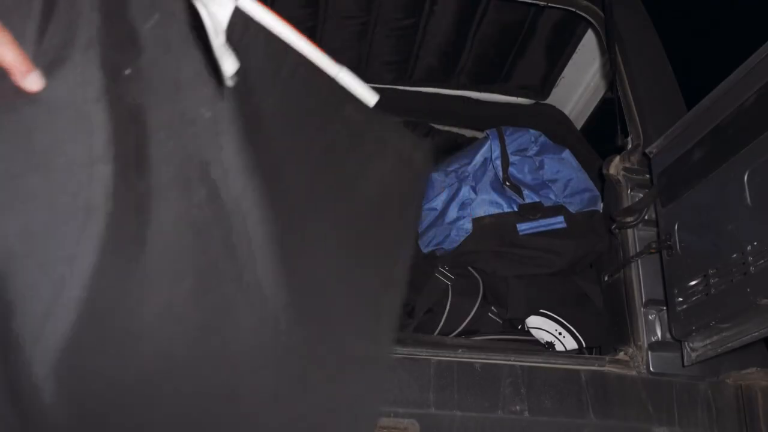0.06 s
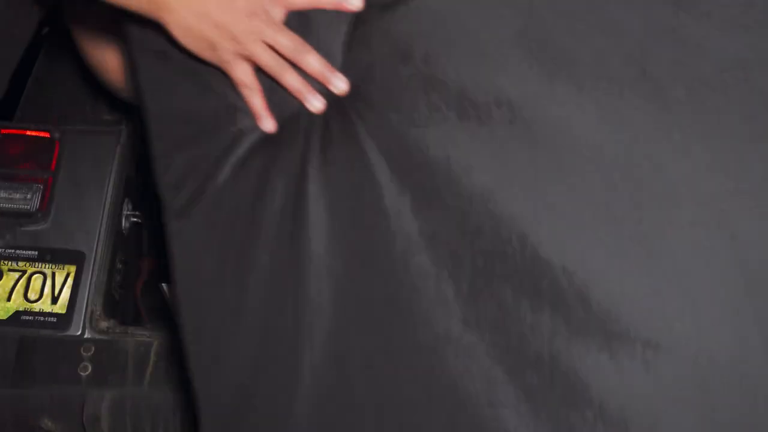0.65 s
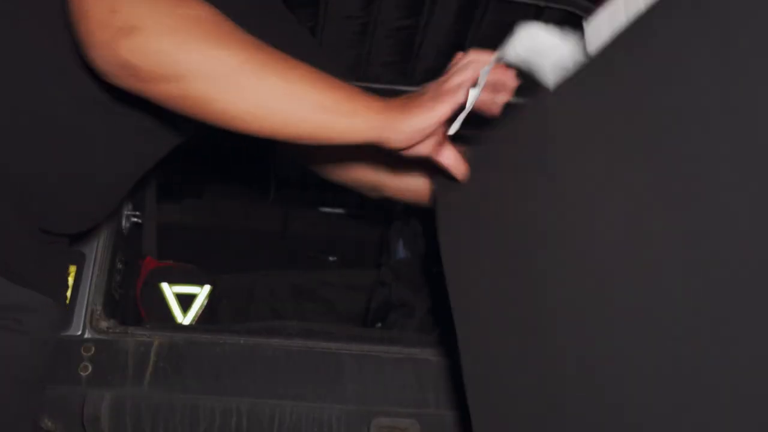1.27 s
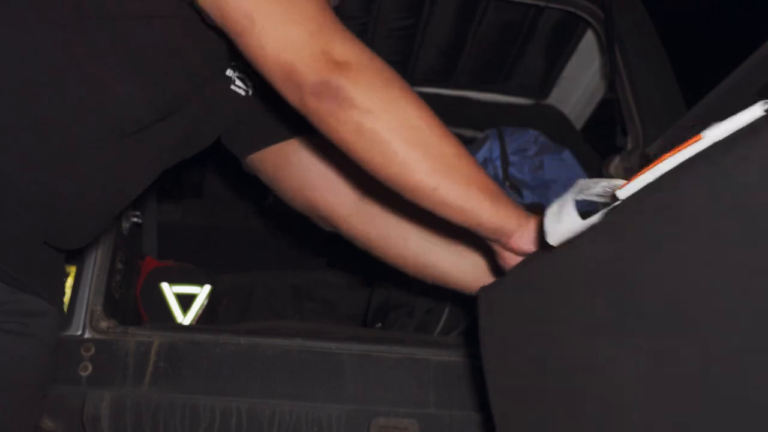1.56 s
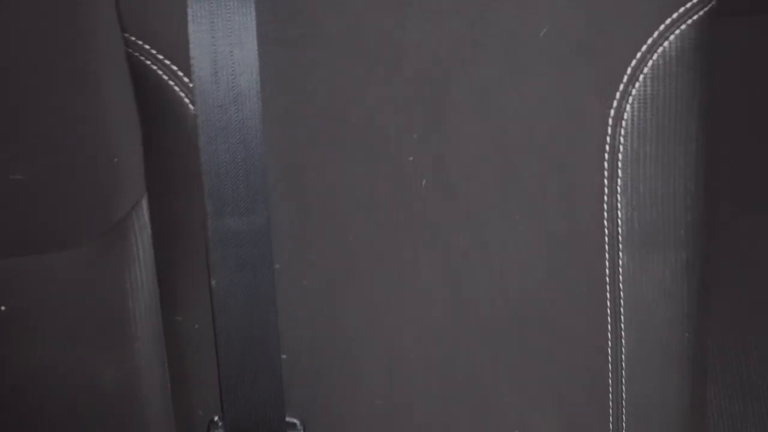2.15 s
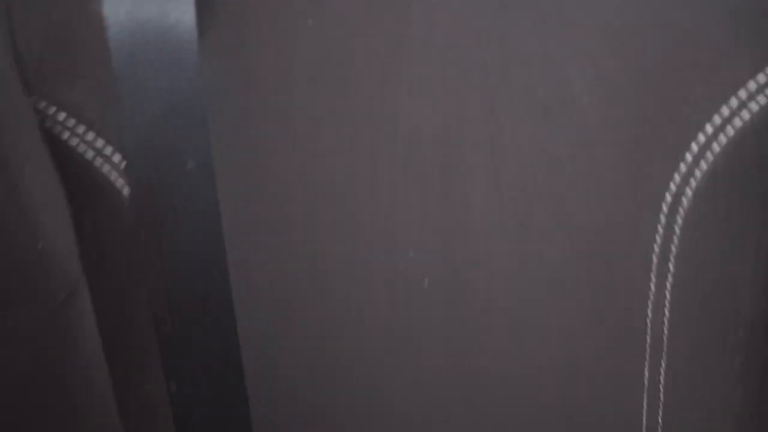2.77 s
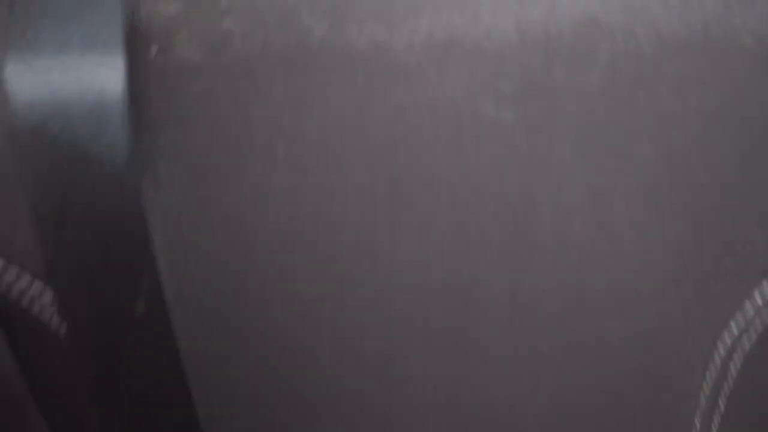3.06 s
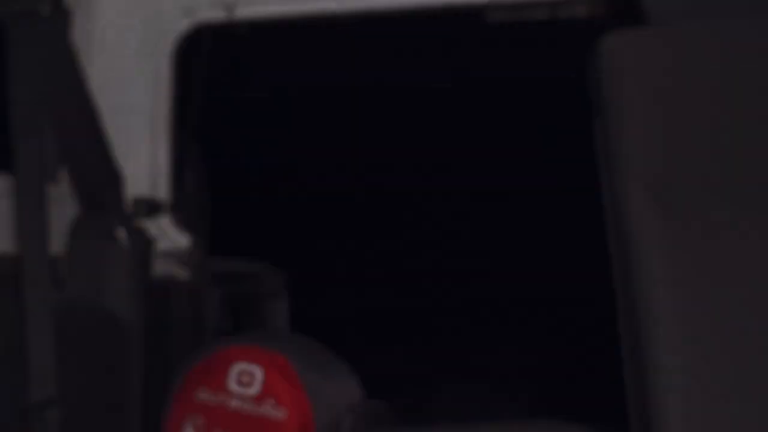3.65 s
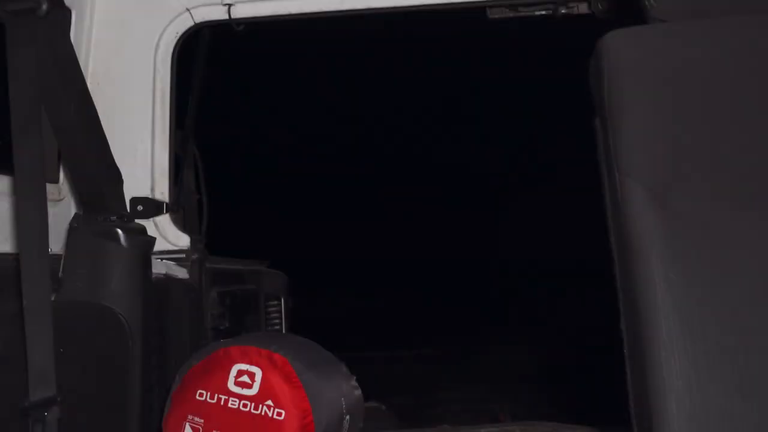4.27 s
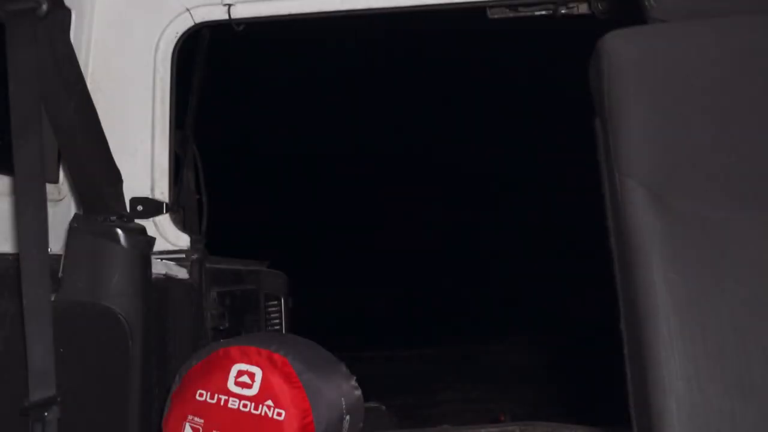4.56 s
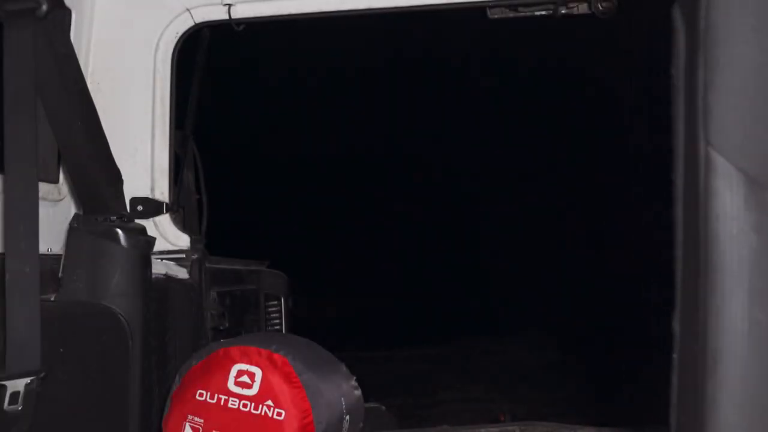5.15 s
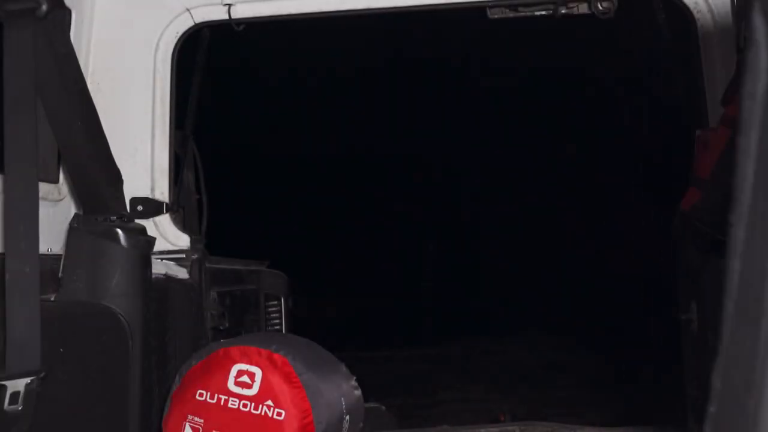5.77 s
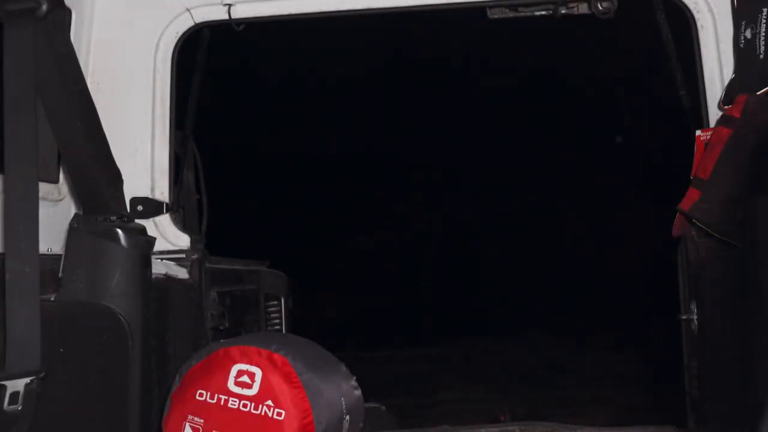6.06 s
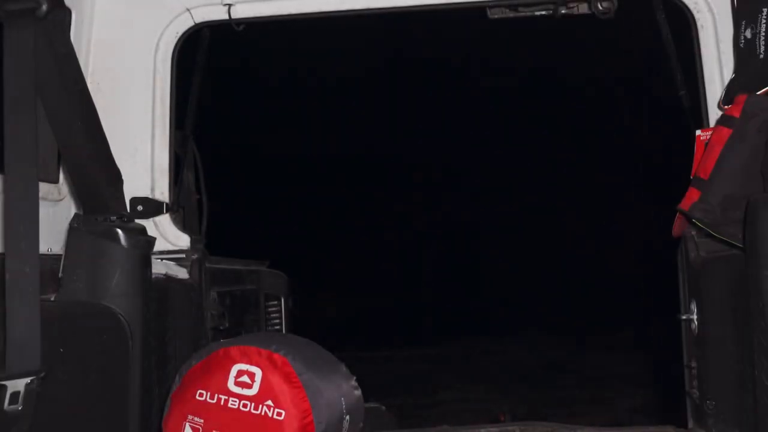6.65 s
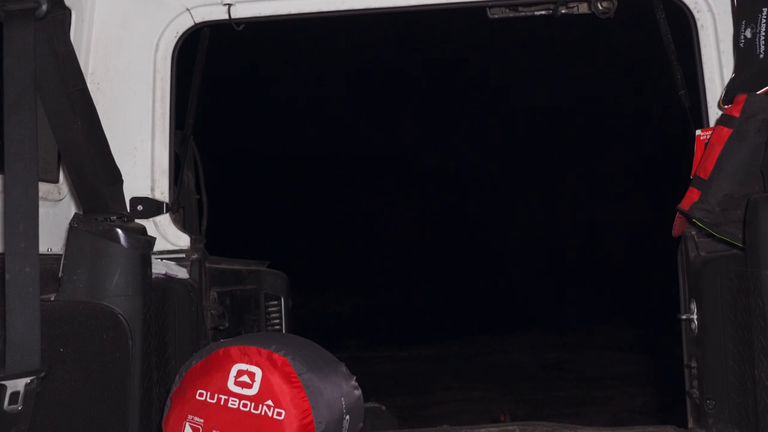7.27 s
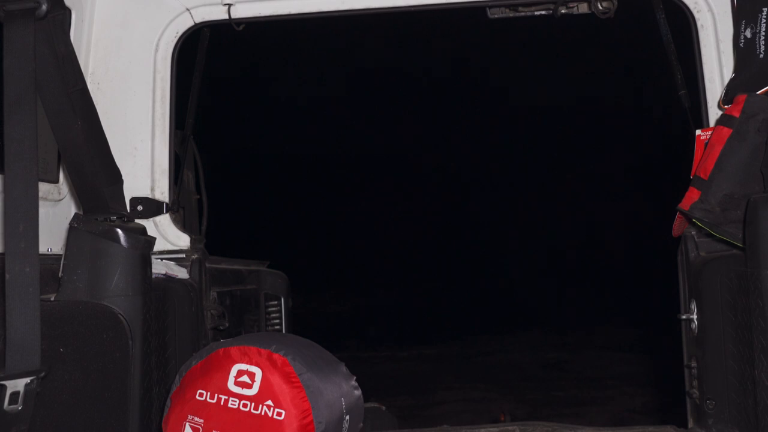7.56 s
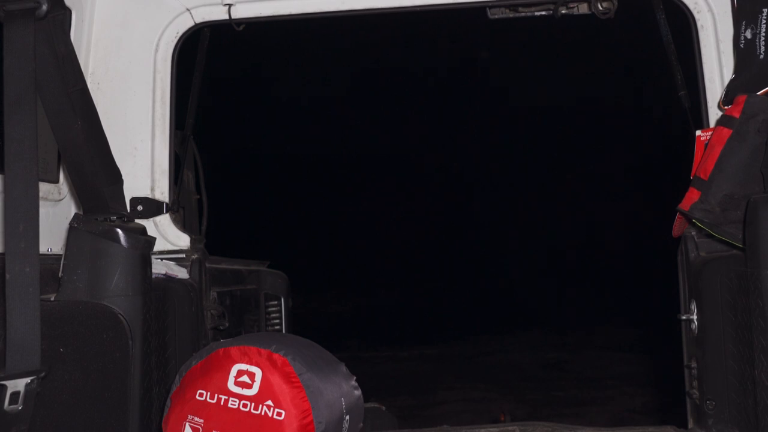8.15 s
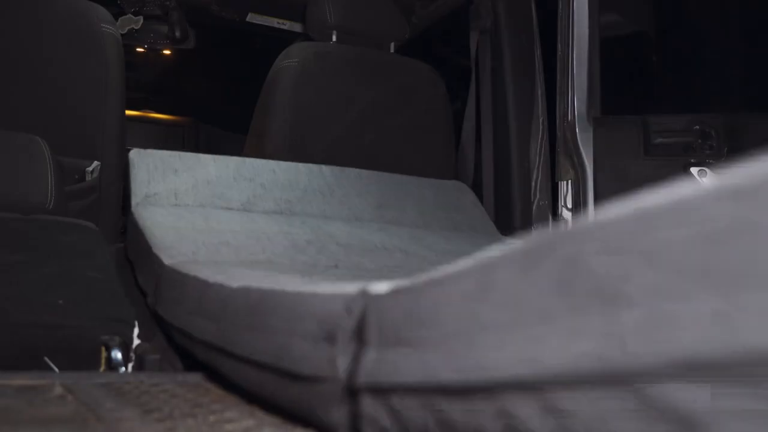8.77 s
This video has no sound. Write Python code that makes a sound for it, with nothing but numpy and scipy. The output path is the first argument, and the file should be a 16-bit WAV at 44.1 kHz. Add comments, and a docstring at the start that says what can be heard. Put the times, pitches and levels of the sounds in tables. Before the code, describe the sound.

Close cloth rubbing and scuffing in a car's cargo area, bags bumping the trim and floor while the cabin booms dully.

```python
"""Back of a parked car at night: a foam mattress and nylon gear bags are pushed about.
Cloth slides and scuffs over upholstery, among short flaps, light knocks and small bright ticks.
Each shift of weight flexes the body shell and makes the cabin boom. Bags bump the trim and the floor.
Friction is shaped noise; blows are gritty force pulses through resonances, with a short cabin tail."""
import sys
import numpy as np
from scipy import signal
from scipy.fft import rfft, irfft
from scipy.io import wavfile
from scipy.ndimage import uniform_filter1d, minimum_filter1d

SR = 44100
rng = np.random.default_rng(int(sys.argv[2]) if len(sys.argv) > 2 else 0)


def master(y):
    """Save y as 16-bit WAV."""
    cut = np.clip(np.atleast_2d(y).T, -1, 1)
    pcm = np.round(cut * 32767)  # scale
    wavfile.write(sys.argv[1], SR, pcm.astype(np.int16))


N = 392490
TIME = np.arange(N) / SR


def from_db(db):
    return 10 ** (np.asarray(db) / 20)


def rms_one(x):
    return x / np.sqrt(np.mean(x ** 2) + 1e-20)


def loudest_one(x, size):
    """Scale the loudest stretch of size samples to rms 1."""
    return x / np.sqrt(uniform_filter1d(x * x, size).max())


def in_time(rows):
    """Breakpoint columns, interpolated per sample."""
    times, *columns = np.transpose(rows)
    return [np.interp(TIME, times, column) for column in columns]


def add(out, start_s, sound):
    start = max(round(start_s * SR), 0)
    out[start:start + len(sound)] += sound[:N - start]


def drift(rate_hz):
    """Smooth random curve, rms 1."""
    step = 40
    pole = np.exp(-2 * np.pi * rate_hz * step / SR)
    slow = signal.lfilter([1], [1, -2 * pole, pole * pole], rng.standard_normal(N // step + 2002))[2000:]
    return np.interp(np.arange(N) / step, np.arange(len(slow)), rms_one(slow))


def coloured(x, spectrum):
    """Shape x by a spectrum table; rms 1."""
    hz, db = np.transpose(spectrum)
    bins_hz = np.maximum(np.fft.rfftfreq(N, 1 / SR), 1)
    gain = from_db(np.interp(np.log(bins_hz), np.log(hz), db))
    return rms_one(irfft(rfft(x) * gain, N))


def cut(x, hz, kind, order=2):
    return signal.sosfilt(signal.butter(order, min(hz, SR / 2 - 1), kind, fs=SR, output="sos"), x)


def resonance(x, hz, width_hz):
    """Band-pass, unity peak gain."""
    r = np.exp(-np.pi * width_hz / SR)
    feedback = [1, -2 * r * np.cos(2 * np.pi * hz / SR), r * r]
    return signal.lfilter(np.array([1, 0, -1]) * (1 - r * r) / 2, feedback, x + 1e-18)


def body(x, modes, vary_db=0, vary_pitch=0):
    """Parallel modes; strengths and tuning vary with the contact point."""
    detune = np.exp(vary_pitch * rng.standard_normal())
    return sum((-1) ** k * from_db(db + vary_db * rng.standard_normal())
               * resonance(x, hz * detune, width_hz) for k, (hz, width_hz, db) in enumerate(modes))


def grains(per_s, spread_db):
    """Fibres catch and release: random clicks of uneven size, rms 1."""
    sizes = from_db(spread_db * np.minimum(rng.exponential(1, N), 4)) * rng.choice([-1, 1], N)
    return rms_one(sizes * (rng.random(N) < per_s / SR))


def contact(give_s, settle_s, settle_db):
    """Gritty force: a pulse as the padding gives, then decaying slips."""
    t = TIME[:SR // 2]
    crush = (t / give_s * np.exp(1 - t / give_s)) ** 3
    slips = from_db(settle_db - 60 * t / settle_s) * (1 - np.exp(-t / give_s))
    return (crush + slips) * rng.standard_normal(len(t))


def effort(start_s, length_s, attack_s, release_db_per_s, swell_db=0):
    """Gain of one movement: ramp up to start_s, sloped hold, decay."""
    t = TIME - start_s
    attack = np.clip(1 + t / attack_s, 0, 1)
    held_db = swell_db * (np.clip(t / length_s, 0, 1) - .5)
    return attack * from_db(held_db - release_db_per_s * np.clip(t - length_s, 0, 1))


# Cloth never quite at rest: time_s, rub_db, hiss_db
STIRRING = [(0, -31.5, -43), (1.71, -38, -33.5), (1.74, -41, -49.5), (3.34, -44, -53.5), (3.55, -37, -45.5),
            (8.3, -39.5, -43), (8.7, -26.5, -32.5)]
# Pushes and pulls: start_s, length_s, rub_db, hiss_db, swell_db
STROKES = [(0.128, 0.099, -25, -31, 5.5), (0.315, 0.13, -32, -31, 5), (0.564, 0.091, -59, -43.5, -14),
           (0.793, 0.16, -26, -26.5, 1), (1.016, 0.2, -31.5, -32, 5), (1.389, 0.066, -20.5, -27, 9.5),
           (1.617, 0.084, -31, -32.5, -3), (1.728, 0.44, -39, -51.5, -5), (2.612, 0.084, -30, -39, -7),
           (2.677, 0.2, -33.5, -45, 5), (3.024, 0.23, -41, -43.5, 2), (3.451, 0.12, -26.5, -34, 0),
           (3.71, 0.084, -26.5, -34.5, -2.5), (4.002, 0.14, -38, -38.5, 12), (4.22, 0.069, -25, -30.5, 8),
           (4.596, 0.57, -30, -35, -3.5), (5.306, 0.18, -30.5, -37, 14), (5.673, 0.28, -30.5, -38, 1.5),
           (5.974, 0.67, -33.5, -47.5, 8.5), (6.67, 0.27, -26, -37.5, -3), (6.964, 0.06, -21.5, -28, 8.5),
           (7.19, 0.23, -31.5, -36, -2.5), (7.667, 0.12, -35, -40.5, -6), (7.97, 0.34, -50, -40.5, 9.5),
           (8.461, 0.1, -21, -25.5, 8), (8.772, 0.13, -22.5, -23.5, -3.5)]


def sliding_levels():
    """Rub and hiss in dB: each stroke adds its power to the stirring cloth."""
    rub_power, hiss_power = from_db(in_time(STIRRING)) ** 2
    for start_s, length_s, rub_db, hiss_db, swell_db in STROKES:
        gain = effort(start_s, length_s, attack_s=0.075, release_db_per_s=300, swell_db=swell_db)
        rub_power += (from_db(rub_db) * gain) ** 2
        hiss_power += (from_db(hiss_db) * gain) ** 2
    return 10 * np.log10(rub_power), 10 * np.log10(hiss_power)


# Padding friction: freq_hz, gain_db
RUB_SPECTRUM = [(90, 0.5), (180, -4.5), (330, -1), (520, -1.5), (680, -4), (900, 0), (1200, -9.5),
                (1700, -17), (2600, -20), (5000, -122)]
# Weave friction: freq_hz, gain_db
HISS_SPECTRUM = [(500, 2), (1200, 5), (1900, 2), (2700, 2.5), (3500, 5), (4400, -1.5), (5600, -2.5),
                 (7200, -9), (11000, -12.5), (16000, -16)]
# Nearness of the cloth: time_s, treble_db
SHEEN = [(0, 17.5), (.7, 1.5), (1.2, 7.5), (1.71, -4), (1.73, -12), (8.3, -7.5), (8.9, 6)]


def sliding_cloth(rub_db, hiss_db, jerk_db=2.5, flutter_db=2.5, crinkle_db=-5,
                  sheen_hz=7000, weave_hz=3900):
    """Padding rubs, weave hisses and crinkles; both follow the same jerks of the hand."""
    jerks_db = jerk_db * drift(9.5)
    rub = coloured(grains(per_s=7000, spread_db=0.93), RUB_SPECTRUM)
    rub *= from_db(rub_db + jerks_db + flutter_db * drift(72))
    weave = rng.standard_normal(N) + from_db(crinkle_db) * grains(per_s=500, spread_db=3.1)
    hiss = coloured(weave, HISS_SPECTRUM) * from_db(hiss_db + jerks_db)
    # Folds turn and tighten: two bands of the hiss rise and dip.
    whistle = resonance(hiss, weave_hz, weave_hz / 4) * (from_db(2 * drift(30)) - 1)
    sheen = cut(hiss, sheen_hz, "high", order=1) * (from_db(in_time(SHEEN)[0] + drift(8.2)) - 1)
    return rub + hiss + whistle + sheen


# Short flaps, cracks and light knocks: start_s, level_db, pitch_hz
FLAPS_AND_KNOCKS = [(0.302, -13, 328), (0.387, -9, 250), (0.432, -10.5, 337), (0.6735, -20, 383),
                    (1.3682, -8, 304), (1.4725, -5, 2140), (2.824, -11.5, 1120), (3.797, -12, 1840),
                    (4.561, -17.5, 1170), (4.796, -14.5, 1060), (5.839, -11, 700), (7.288, -18.5, 925),
                    (7.643, -11, 250), (8.523, -10, 1530), (8.567, -8, 2730)]


def flaps_and_knocks(give_cycles=0.5, settle_cycles=25, settle_db=-13):
    """Each is a single pitched pulse; lower ones are slower."""
    out = np.zeros(N)
    for start_s, level_db, hz in FLAPS_AND_KNOCKS:
        force = contact(give_cycles / hz, settle_cycles / hz, settle_db)
        pulse = cut(resonance(force, hz, width_hz=hz), 2 * hz, "low")
        add(out, start_s, from_db(level_db) * loudest_one(pulse, size=88))
    return out


# Padding and nylon dragged under pressure: centre_s, half_length_s, pitch_hz, level_db, width_ratio
SCUFFS = [(0.42, 0.05, 379.5, -19, 0.9), (1.149, 0.099, 850, -27, 0.31), (1.231, 0.024, 981, -13.5, 0.21),
          (1.412, 0.038, 381, -14, 1.4), (1.57, 0.09, 230, -21, 1.5), (2.44, 0.058, 576, -19.5, 0.97),
          (2.694, 0.068, 557, -22, 0.41), (4.001, 0.1, 2920, -42, 0.13), (4.261, 0.05, 860, -23, 0.13),
          (4.417, 0.16, 1800, -33, 0.57), (4.609, 0.067, 972, -18, 0.22), (5.525, 0.0565, 753, -21.5, 0.47),
          (5.574, 0.062, 175, -17.5, 0.7), (5.738, 0.08, 3860, -37.5, 0.14),
          (6.292, 0.06, 4060, -33.5, 0.57), (6.699, 0.034, 703, -24.5, 0.15),
          (8.623, 0.04, 230, -14.5, 0.84), (8.832, 0.085, 2950, -22.5, 0.34)]


def scuffs(glide=0.073, rasp_db=-11.5):
    """Stick-slip, its rate rising with the pull: a pitched band with a rasp above."""
    out, t = np.zeros(N), TIME[:SR // 2] - 0.25
    for centre_s, half_length_s, hz, level_db, width_ratio in SCUFFS:
        noise = rng.standard_normal(len(t)) + 1j * rng.standard_normal(len(t))
        unevenness = cut(noise, hz * width_ratio / 2, "low")
        slip_hz = hz * (1 + glide * np.tanh(t / half_length_s))
        phase = 2 * np.pi * np.cumsum(slip_hz) / SR
        band = rms_one((unevenness * np.exp(1j * phase)).real)
        rasp = resonance(rng.standard_normal(len(t)), 1.45 * hz, width_hz=hz)
        rasp = rms_one(cut(rasp, 2 * hz, "low"))
        scuff = np.exp(-(t / half_length_s) ** 2) * (band + from_db(rasp_db) * rasp)
        add(out, centre_s + t[0], from_db(level_db) * loudest_one(scuff, size=1500))
    return out


# Car rocking once someone leans in: time_s, load_db
ROCKING = [(1.2, -40), (1.5, -19), (3.8, -21.5), (4.5, -12.5), (8.9, -14)]
# Shifts of weight: start_s, length_s, load_db
SHOVES = [(1.656, 0.22, -3), (2.5, 0.045, -7), (4.487, 0.37, -8), (5.61, 0.15, -5), (6.05, 0.26, -9),
          (7.086, 0.18, -4.5), (7.856, 0.26, -10)]


def floor_load():
    """Floor flex in dB: each shove adds its power to the rocking."""
    power = from_db(in_time(ROCKING)[0]) ** 2
    for start_s, length_s, load_db in SHOVES:
        gain = effort(start_s, length_s, attack_s=0.1, release_db_per_s=213)
        power += (from_db(load_db) * gain) ** 2
    return 10 * np.log10(power)


# Floor panels and cabin air: freq_hz, width_hz, gain_db
PANEL_MODES = [(73.7, 15.5, 1), (124.6, 17.4, 0), (160, 28, -3.5), (240, 40, -4.5)]


def cabin_boom(load_db, rub_db, boom_hz=29.42, wander=0.17, boom_db=-5, rumble_db=-7.5,
               surge_db=5, load_share=0.36, seated_db=-13):
    """The shell flexes at its lowest mode; panels rumble with rubbing, and with load until seated."""
    swell_db = surge_db * drift(19.3)
    phase = 2 * np.pi * np.cumsum(boom_hz * np.exp(wander * drift(10.74))) / SR
    boom = np.sqrt(2) * np.sin(phase) * from_db(load_db + boom_db + swell_db)
    push = cut(rng.standard_normal(N), 100, "low", order=1)
    drive_db = load_share * np.minimum(load_db, seated_db) + (1 - load_share) * rub_db
    rumble = rms_one(body(push, PANEL_MODES)) * from_db(drive_db + rumble_db + swell_db)
    return boom + rumble


# Plastic side trim: freq_hz, width_hz, gain_db
TRIM_MODES = [(375, 196, 0), (572, 340, -1), (877, 79, 6.5), (980, 310, 0), (1660, 1360, -10)]
# Hard, light parts: freq_hz, width_hz, gain_db
HARD_MODES = [(2280, 740, 7), (3460, 780, 9.5), (5060, 2200, -1.5)]
# Bags hitting trim and floor: start_s, knock_db, thump_db, crack_db, give_s
BUMPS = [(1.374, -13, -15.5, -18.5, 0.0018), (1.5214, -13, -5, -56, 0.0017), (2.402, -2, -8, -6.5, 0.0052),
         (2.617, -13, -19, -25, 0.002), (2.829, -10.5, -16, -15.5, 0.0016),
         (3.426, -16.5, -18.5, -31, 0.0048), (3.485, -15, -18.5, -36, 0.0036),
         (4.296, -13, -15, -27, 0.0031), (4.333, -5, -10.5, -20.5, 0.0064),
         (5.214, -8, -7.5, -29.5, 0.0014), (5.473, -0.5, -12, -7.5, 0.0072),
         (5.779, -21, -17.5, -35, 0.011), (5.953, -5, -14.5, -17, 0.0025), (6.749, -9.5, -7.5, -36, 0.0033),
         (6.804, -15.5, -19, -16.5, 0.0018), (7, -11.5, -14, -30, 0.0031), (7.631, -24.5, -13, -51, 0.003),
         (8.592, -18.5, -11.5, -16, 0.002)]


def bumps(soft_hz=190, bare_hz=4000, padding=0.78, brush_s=0.058, brush_db=-16):
    """A bag brushes and knocks the trim, thumps the floor and cracks on hard parts."""
    out, t = np.zeros(N), TIME[:SR // 2]
    for start_s, knock_db, thump_db, crack_db, give_s in BUMPS:
        padded_hz = bare_hz * from_db(padding * (crack_db - knock_db))  # less crack, duller knock
        trim_force = cut(contact(give_s, settle_s=0.08, settle_db=-6), padded_hz, "low", order=1)
        knock = body(trim_force, TRIM_MODES, vary_db=0.29, vary_pitch=0.042)
        floor_force = cut(contact(give_s, settle_s=0.27, settle_db=-15), soft_hz, "low", order=1)
        thump = body(floor_force, PANEL_MODES, vary_db=2.8, vary_pitch=0.053)
        hard_force = contact(give_s, settle_s=0.089, settle_db=-6.5)
        crack = body(hard_force, HARD_MODES, vary_db=0.35, vary_pitch=0.081)
        brush = rms_one(resonance(rng.standard_normal(len(t)), bare_hz, 2 * bare_hz))
        brush *= from_db(-60 * t[::-1] / brush_s)  # swells into the blow
        add(out, start_s - t[-1], from_db(crack_db + brush_db) * brush)
        add(out, start_s, from_db(knock_db) * loudest_one(knock, size=220))
        add(out, start_s, from_db(thump_db) * loudest_one(thump, size=900))
        add(out, start_s, from_db(crack_db) * loudest_one(crack, size=220))
    return out


# Heavy bags coming to rest: start_s, level_db, pitch_hz
LANDINGS = [(1.904, -24.5, 111), (2.46, -14.5, 79.8), (3.491, -14.5, 69), (4.682, -10.5, 64.3),
            (5.232, -7.5, 67.4), (5.778, -7.5, 73.2), (5.96, -7.5, 69), (6.9, -11, 73.5), (7.672, -6.5, 48)]


def floor_bounces(rise_s=0.029, sag=0.12):
    """The floor swings a few times, its pitch sinking as it takes the weight."""
    out, age = np.zeros(N), TIME[:SR // 2] / rise_s
    for start_s, level_db, hz in LANDINGS:
        phase = 2 * np.pi * np.cumsum(hz * (1 + sag * np.exp(-age))) / SR
        add(out, start_s, from_db(level_db) * age * np.exp(1 - age) * np.sin(phase))
    return out


# Small bright ticks, and the sharp top of the loud bump at 2.4 s: start_s, level_db, pitch_hz
TICKS = [(2.405, -18.5, 4770), (3.758, -25.5, 2890), (3.908, -30, 2740), (5.19, -21.5, 1460),
         (6.567, -22.5, 3980), (6.65, -22.5, 3730), (7.032, -20, 3380), (7.154, -24.5, 3240),
         (7.208, -24.5, 3600), (7.209, -29, 12000), (7.351, -32, 4730), (7.393, -25.5, 3720),
         (8.438, -17.5, 3050)]


def ticks(width_ratio=0.49, chatter_s=0.068, hardness_hz=1500):
    """Brief chatter through one resonance; higher ticks are harder, with more treble."""
    out = np.zeros(N)
    for start_s, level_db, hz in TICKS:
        force = contact(give_s=0.0007, settle_s=chatter_s, settle_db=6.6)
        ring = resonance(cut(force, hz * hz / hardness_hz, "low"), hz, width_ratio * hz)
        add(out, start_s, from_db(level_db) * loudest_one(ring, size=220))
    return out


def cabin_reverb(x, t60_s=0.035, delay_s=0.003, wet_db=-18.5, dull_hz=3500):
    """Glass and upholstery add a very short, dull tail."""
    t = TIME[:SR // 4]
    reflections = rng.standard_normal(len(t)) * from_db(-60 * t / t60_s) * (t > delay_s)
    tail = cut(reflections, dull_hz, "low")
    return x + from_db(wet_db) * signal.fftconvolve(x, tail / np.linalg.norm(tail))[:N]


def scene():
    """Mono mix: cloth and floor dry; bumps, flaps, knocks and ticks through the cabin."""
    rub_db, hiss_db = sliding_levels()
    floor = cabin_boom(floor_load(), rub_db) + floor_bounces()
    cloth = sliding_cloth(rub_db, hiss_db) + scuffs()
    impacts = cabin_reverb(bumps() + flaps_and_knocks() + ticks())
    return (cloth + floor + impacts)[None]


def record(dry, ceiling=0.8, release_db_per_s=600, cutoff_hz=15900):
    """Fast limiter, then a steep low-pass."""
    over_db = np.maximum(20 * np.log10(np.abs(dry) / ceiling + 1e-9), 0)
    release_db = release_db_per_s * TIME
    held_db = np.maximum.accumulate(over_db + release_db, axis=-1) - release_db
    gain_db = uniform_filter1d(minimum_filter1d(-held_db, size=21), size=21)
    low_pass = signal.ellip(12, .1, 80, cutoff_hz, fs=SR, output="sos")
    return signal.sosfilt(low_pass, dry * from_db(gain_db))


dry = scene()
out = record(dry)
master(out)
```